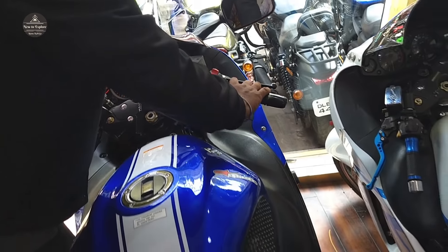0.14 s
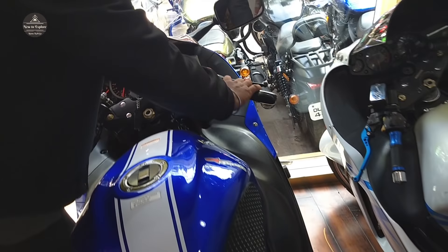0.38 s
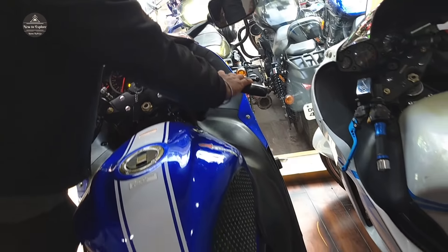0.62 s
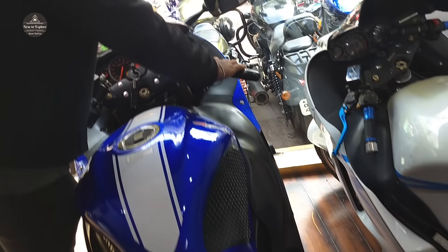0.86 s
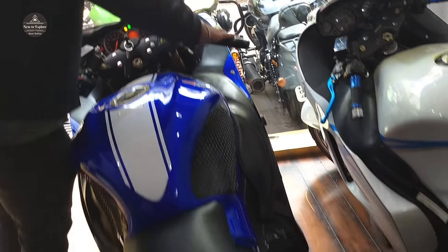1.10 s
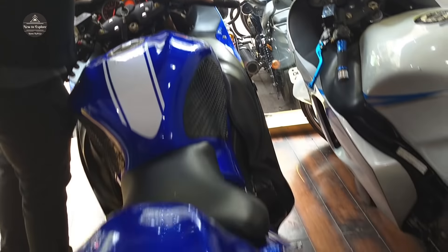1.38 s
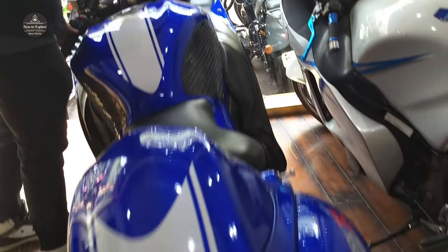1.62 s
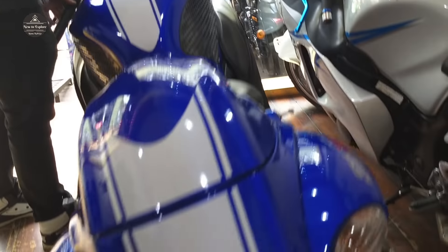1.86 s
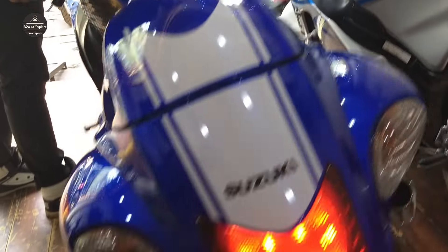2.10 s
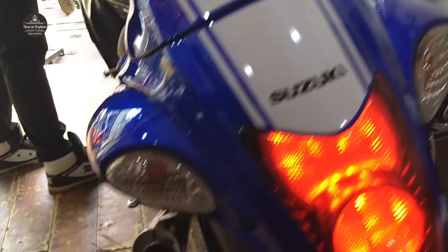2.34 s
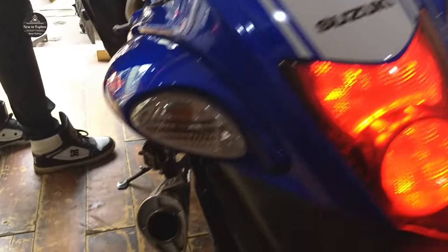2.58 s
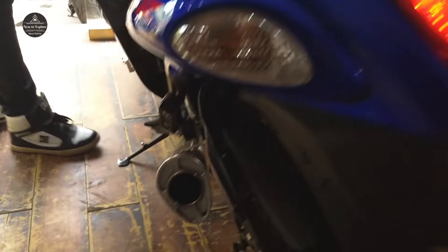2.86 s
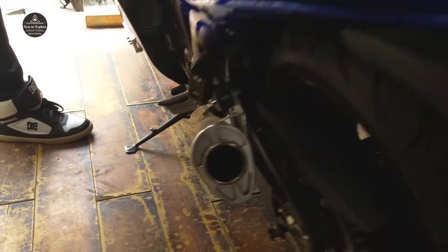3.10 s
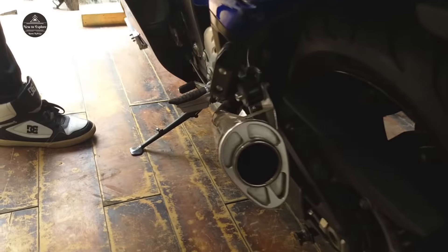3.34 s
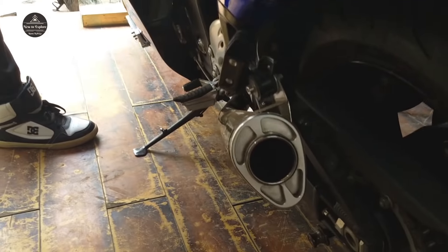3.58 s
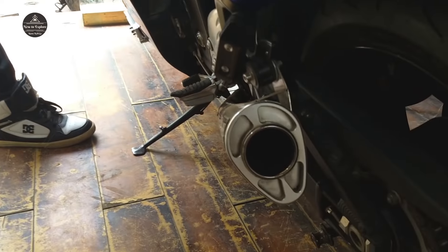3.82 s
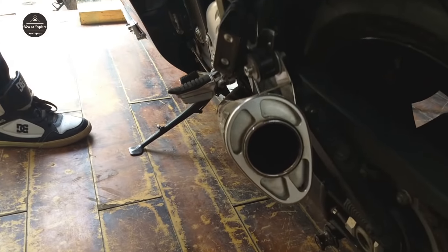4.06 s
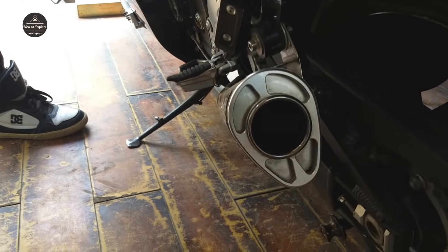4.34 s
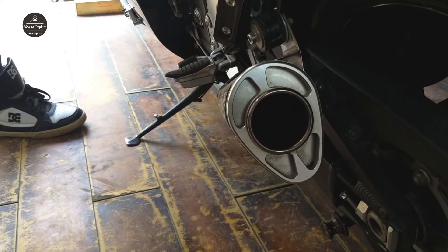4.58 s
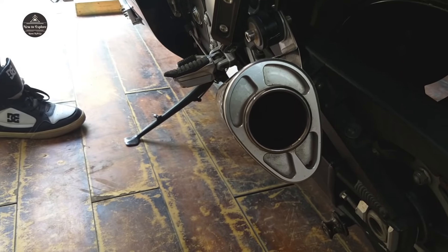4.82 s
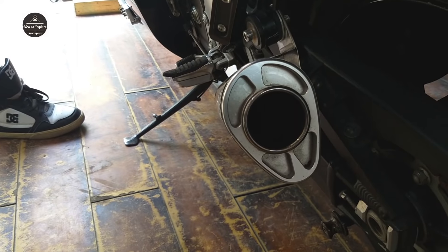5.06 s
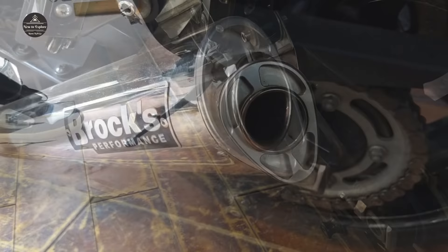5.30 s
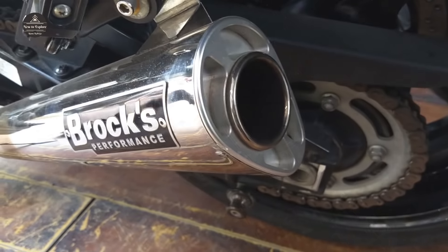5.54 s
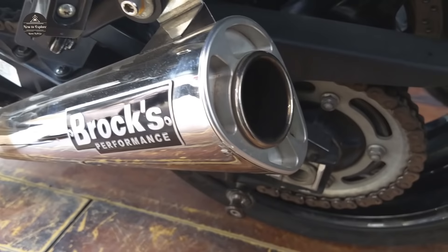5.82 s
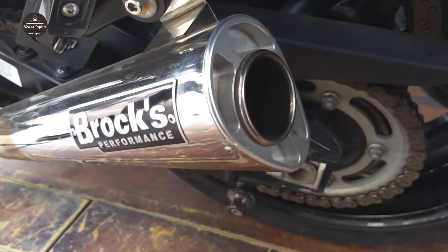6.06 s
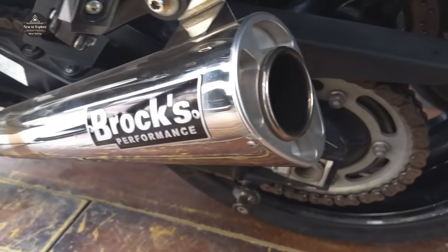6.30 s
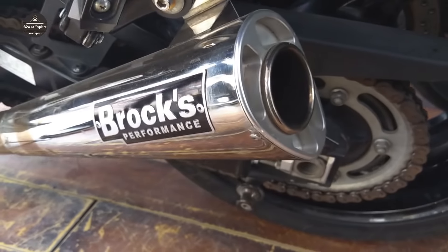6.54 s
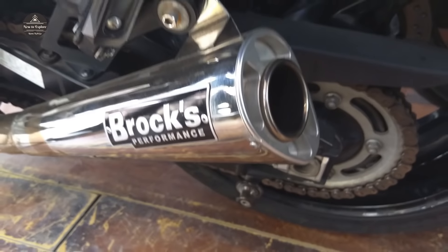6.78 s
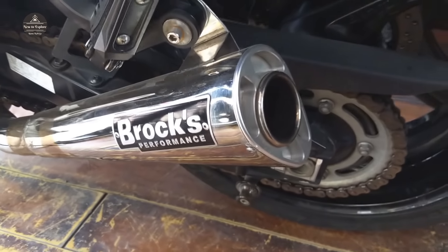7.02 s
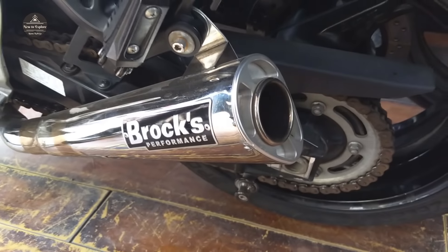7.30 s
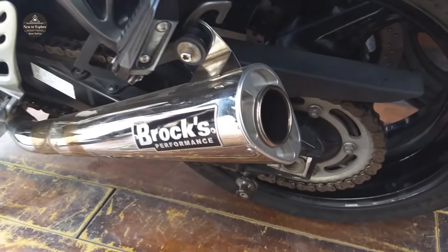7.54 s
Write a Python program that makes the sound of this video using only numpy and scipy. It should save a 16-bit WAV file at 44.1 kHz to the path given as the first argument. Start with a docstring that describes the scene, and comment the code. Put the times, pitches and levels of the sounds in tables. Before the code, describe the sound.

A four-cylinder sport motorcycle idles continuously in a shop for about 7.6 seconds, with no big revs. From 0 to 2 seconds the microphone is close above the tank: the idle is lumpy, with quick hissing gas surges several times a second, strongest around 0.5 to 0.9, each led by a low boom, over a rough rumble and faint valve ticks. Between 2 and 2.7 it passes behind the machine; surges soften and a deep, buzzing hum of regular firing comes forward, wavering slightly in pitch and strength. From 4.1 the hum stumbles briefly now and then. Around 5.35 the view steps beside the pipe end with a soft low puff and a brief break in the hum; the hiss changes colour, its treble first duller, then recovering. Another clear miss and boom comes near 6.65, then the throaty idle runs on and is cut off. Loudness stays nearly level.

```python
"""In a shop, a four-cylinder sport motorcycle idles lumpily; the microphone moves from above the tank
to behind the machine, then beside the exhaust pipe end. Regular firings hum as steady tones, uneven
ones boom as coloured noise, and the pipe rings at its own notes. Filtered noise makes the gas hiss, short
rings make the valves tick, and one soft low push is a puff of gas. A fast gain control then
evens out the loudness, so the levels in the tables are those before it."""
import sys
import numpy as np
from scipy import signal
from scipy.io import wavfile
from scipy.ndimage import uniform_filter1d

SR = 44100
rng = np.random.default_rng(int(sys.argv[2]) if len(sys.argv) > 2 else 0)


def generate_wav(sig):
    """Save sig (samples, or channels by samples) to the path in sys.argv[1] as 16-bit PCM at SR."""
    pcm = np.round(np.clip(np.atleast_2d(sig).T, -1, 1) * 32767).astype(np.int16)
    wavfile.write(sys.argv[1], SR, pcm)


def volts(x):
    """Linear amplitude factor 10**(x/20) for a level x in dB, scalar or array-like."""
    e = np.asarray(x, float) / 20
    return 10 ** e


N = 337365


def evened(x):
    """Scales a sound to an average strength (rms) of 1."""
    return x / np.sqrt(np.mean(x ** 2) + 1e-20)


def curves(rows):
    """Draws straight lines between the rows of a table, one curve for each column after the time."""
    times, *columns = np.transpose(rows)
    return [np.interp(np.arange(N) / SR, times, column) for column in columns]


def wander(hz):
    """Slow chance: noise with what lies above hz filtered away, rms 1."""
    lowpass = signal.butter(2, hz, fs=SR, output="sos")
    return evened(signal.sosfilt(lowpass, rng.standard_normal(N)))


def coloured(x, points, size=16384):
    """Filters a sound to the given spectrum, with no sound ahead of its cause (minimum phase)."""
    f, db = np.transpose(points)
    hz = np.abs(np.fft.fftfreq(size, 1 / SR))
    level_db = np.interp(np.log(hz + 1), np.log(f + 1), db)
    log_gain = np.log(volts(np.maximum(level_db, -100)))
    taps = np.fft.ifft(np.exp(np.conj(signal.hilbert(log_gain)))).real[:size // 2]
    return signal.oaconvolve(x, taps)[:N]


def bumps(times, heights, lengths):
    """Smooth swells, each centred on its time and as wide as its length at half height."""
    t = np.arange(0, N + 64, 64) / SR  # a coarse clock is enough for slow swells
    swells = sum(height * np.exp(-4 * np.log(2) * ((t - s) / length) ** 2)
                 for s, height, length in zip(times, heights, lengths))
    return np.interp(np.arange(N) / SR, t, swells)


# How much of the front of the engine is heard as the microphone leaves the tank: t/s, share (0-1)
FRONT_SHARE = [(0, 0.94), (1.2, 0.88), (1.9, .75), (2.15, 0.5), (2.45, 0.07), (2.7, 0.12), (7.65, 0.06)]


def placed(above, behind, beside):
    """Blends three values as the microphone goes from above the tank to behind, then beside the pipe end."""
    beside_s, step_s = 5.35, 0.088  # middle and length of the step to the side
    front = np.clip(curves(FRONT_SHARE)[0], 0, 1)
    step = np.clip((np.arange(N) / SR - beside_s) / step_s + .5, 0, 1)
    return front * above + (1 - front) * ((1 - step) * behind + step * beside)


# Gas hiss between the surges: t/s, level/dB
HISS_BASE = [(0, -48), (.5, -50), (1.3, -46.5), (2.3, -46.5), (2.9, -44.5), (3.4, -45), (4.1, -45.5),
             (4.5, -47), (5.2, -48), (6.4, -47.5), (6.9, -47.5), (7.4, -48), (7.65, -46.5)]
# The idle stumbles and gas surges out: t/s of the surge's peak, surge level/dB, surge length/s,
# level/dB of the pipe's boom just before it (below 0: a dip)
IDLE_STUMBLES = [(0.042, 2.5, 0.095, -13), (0.268, 5, .08, 9.5), (0.353, 5, .07, 3), (0.482, 9, .08, 13.5),
                 (0.652, 9.5, .09, 11), (.8, 8, 0.092, 7), (.94, 6.5, 0.073, 8.5), (1.097, 6.5, .07, 4),
                 (1.229, 5, 0.068, 8.5), (1.406, 4, .11, 5), (1.52, 5.5, .09, 9.5), (1.658, 2, .08, 3),
                 (1.83, 2, .07, 11.5), (2.001, 3.5, .06, 1), (2.141, 3, .11, 6), (2.28, 3.5, .13, 10),
                 (2.46, 3, .05, 1), (2.535, 4, .06, 8), (2.838, 2.5, .2, 9), (3.011, 2, 0.064, 4),
                 (3.167, 2.5, .12, 4), (3.472, 2.5, .09, -2), (3.609, 3, .08, 9), (3.9, 2.5, .08, -2),
                 (4.107, 3.5, .13, 5), (4.309, 4, .09, 0), (4.678, 4, .16, 5), (4.834, 3.5, .07, -9),
                 (5.039, 5, .15, 4), (5.371, 5.5, .2, 2), (5.673, 3.5, .1, -2), (5.93, 3.5, .14, 0.5),
                 (6.215, 3.5, .12, 0), (6.666, 4, .12, 10), (6.816, 4, .09, 5), (7.014, 4.5, .2, 8),
                 (7.257, 4.5, .1, 1), (7.571, 3, .09, 6)]


def flow():
    """Level of the gas flow in dB: a slow base plus a surge for each stumble."""
    times, surge_db, length, _ = np.transpose(IDLE_STUMBLES)
    return curves(HISS_BASE)[0] + bumps(times, surge_db, length)


def surge(late_s):
    """How far the gas flow stands above its slow mean, in dB, felt late_s later (below 0: earlier)."""
    flow_db = flow()
    above_mean = flow_db - uniform_filter1d(flow_db, SR // 3)
    return np.roll(above_mean, round(late_s * SR))


# Engine speed before its small unsteadiness: t/s, firing rate f/Hz
ENGINE_SPEED = [(0, 43.9), (.75, 44.4), (1.0, 44.3), (1.25, 45), (1.85, 44.1), (2.9, 45.9), (3.25, 45),
                (3.75, 45.1), (4.1, 45.7), (4.5, 44.95), (4.75, 45.5), (5.1, 45.15), (5.75, 45.05),
                (6.05, 45.5), (6.5, 44.9), (7.0, 45.7), (7.4, 45.1), (7.65, 45.06)]


def firings(unsteady=.009, stumble=.0012):
    """Counts firings so far; the crank runs up into each surge and sags after it."""
    lope = stumble * (surge(-.03) - surge(.05))  # stumble: share of the speed per dB
    rate = curves(ENGINE_SPEED)[0] * (1 + lope + unsteady * wander(8))
    return np.cumsum(rate) / SR


# A puff of exhaust gas hits the microphone: t/s of its start, level/dB, f/Hz, length/s
GAS_PUFFS = [(5.33, -20, 29.5, 0.035)]


def puffs():
    """A puff of gas is a low, soft push: a slow swing that swells and fades."""
    t = np.arange(N) / SR
    total = 0
    for s, db, hz, length in GAS_PUFFS:
        swell = np.exp(-.5 * ((t - s - length / 2) / (length / 3)) ** 2)
        total = total + volts(db) * swell * np.sin(2 * np.pi * hz * (t - s))
    return total


# Notes of the ringing valve gear: f/Hz, level/dB, t60/s (time to fall by 60 dB)
VALVE_RINGS = [(5880, -70.5, 0.0071), (12070, -74.5, .0065)]


def valves(turns):
    """Three ticks a firing, of uneven strength, ring the valve cover."""
    ticks = (np.diff(np.floor(3 * turns), prepend=0) > 0) * (1 + .5 * rng.standard_normal(N))
    t = np.arange(2000) / SR
    total = 0
    for hz, db, t60 in VALVE_RINGS:
        ring = volts(-60 * t / t60) * np.sin(2 * np.pi * hz * t)
        total = total + volts(db) * evened(signal.oaconvolve(ticks, ring)[:N])
    return total


# Colour of the hiss above the tank: f/Hz, level/dB
HISS_COLOUR_ABOVE = [(410, -34), (700, -10), (760, -10.5), (860, -2), (1000, -5.5), (1350, -3.5),
                     (1550, -7), (1900, -12), (3210, -19), (5010, -22.5), (7000, -27.5), (12100, -40),
                     (13500, -46)]
# Colour of the hiss behind the machine: f/Hz, level/dB
HISS_COLOUR_BEHIND = [(410, -28.5), (700, -8), (754, -9.5), (853, -3), (942, -6.5), (1200, -3.5),
                      (1470, -8.5), (2200, -11), (3210, -17), (5010, -22), (7000, -29), (10500, -35),
                      (12100, -43), (13500, -49)]
# Colour of the hiss beside the pipe end: f/Hz, level/dB
HISS_COLOUR_BESIDE = [(410, -30.5), (700, -11.5), (1030, -5), (1200, -3.5), (2250, -8), (2680, -14),
                      (3660, -16.5), (6600, -25), (10500, -30), (12200, -37), (14000, -38)]
# Change in the treble of the hiss: t/s, level/dB
HISS_TREBLE = [(0, 0), (5.3, 0), (5.5, -5.5), (6.1, -2.5), (6.6, 1.45), (7.1, 0), (7.65, 1.5)]


def hiss(turns, steady=1.5, puff=0.9, flicker_db=1.27):
    """Gas rushes out as noise, puffing twice a firing, coloured by where the microphone is."""
    puffing = steady + np.exp(-(2 * turns % 1) / puff)  # puff: fading time as a share of the gap
    gas = puffing * volts(flicker_db * wander(58)) * rng.standard_normal(N)
    places = HISS_COLOUR_ABOVE, HISS_COLOUR_BEHIND, HISS_COLOUR_BESIDE
    colour = placed(*(evened(coloured(gas, points)) for points in places))
    lowpass = signal.butter(4, 6500, fs=SR, output="sos")  # treble starts at 6500 Hz
    low = signal.sosfiltfilt(lowpass, colour)
    treble = colour - low
    return volts(flow()) * (low + volts(curves(HISS_TREBLE)[0]) * treble)


# Nearness to the pipe end: t/s, share (0-1)
PIPE_NEARNESS = [(0, 0.3), (1.8, 0.3), (2.5, 0.78), (7.65, 0.93)]
# Colour of the uneven firings above the tank: f/Hz, level/dB
BOOM_COLOUR_ABOVE = [(18, -34), (32, -11.5), (110, -7.5), (190, -4.5), (240, -8.5), (285, -5), (340, -9),
                     (410, -17), (520, -16.5), (620, -27), (760, -33.5), (900, -28.5), (1200, -65.5)]
# Colour of the uneven firings at the pipe end: f/Hz, level/dB
BOOM_COLOUR_PIPE = [(18, -39.5), (32, -13), (70, -16), (110, -3.5), (200, -4.5), (250, -10.5), (310, -9.5),
                    (350, -13), (400, -15.5), (520, -20), (600, -29.5), (900, -38.5), (1200, -66)]
# Unevenness of the firings, before the surges add to it: t/s, level/dB
UNEVENNESS = [(0, -23), (.5, -25), (2, -25.5), (3, -25.5), (4, -24.5), (5, -26.5), (5.5, -26.5),
              (6.5, -25.5), (6.7, -24), (7.1, -24.5), (7.65, -26)]


def lumps(turns, roar=1.12, t60=0.16):
    """Firings are stronger or weaker than the mean; the surplus booms in the pipe and smears in the shop."""
    beats = np.diff(np.floor(2 * turns), prepend=0) > 0  # two kicks a firing
    surplus = evened(beats * rng.standard_normal(N))
    echoes = rng.standard_normal(4000) * volts(-60 * np.arange(4000) / SR / t60)
    smeared = evened(signal.oaconvolve(surplus, echoes)[:N])
    drive = smeared + roar * rng.standard_normal(N)
    near = np.clip(curves(PIPE_NEARNESS)[0], 0, 1)
    above = evened(coloured(drive, BOOM_COLOUR_ABOVE))
    at_pipe = evened(coloured(drive, BOOM_COLOUR_PIPE))
    level_db = curves(UNEVENNESS)[0] + 0.66 * surge(0.0065)
    return volts(level_db) * (np.sqrt(1 - near) * above + np.sqrt(near) * at_pipe)


# Loudness of each pipe note: level/dB above the tank, level/dB behind the machine,
# level/dB beside the pipe end, share of the boom, share of the unevenness, wander level/dB
PIPE_LOUDNESS = [(-25, -47, -43, 1.05, 0.88, .8), (-25, -30, -35.5, 0.59, 1.2, 1.5),
                 (-24, -26.5, -28, 0.17, 0.27, 1.74), (-28, -27.5, -28.5, .2, 1.1, 2.2)]
# Slow change of the three upper pipe notes: t/s, then level/dB of each
PIPE_DRONE = [(0, -2, -2.5, 3.5), (.2, .1, 3.5, -6), (.55, -2.8, 2, 2), (.9, -0.5, 2, 1.5),
              (1.1, 2.5, -2.5, -.1), (1.45, -1, -1, 4), (1.85, 4, -9, -4), (2.2, -3.5, 0.5, 2),
              (3, 1, -3, 3), (3.65, -1, 2, 1), (3.9, 2, 0.17, -2), (4.4, -1, 3.5, 2.5), (5, 3.5, -.1, -1),
              (5.2, -7, 1.5, -0.14), (6.4, -5.5, -2.5, -4.5), (6.7, 5.5, -0.5, 3), (7.2, 1, 2, -2),
              (7.65, 0.8, -9, -1)]


def ringing():
    """Level of each pipe note in dB: it follows the place, the booms and the unevenness of the firings."""
    times, _, _, boom_db = np.transpose(IDLE_STUMBLES)
    lead_s, length_s = 0.044, 0.075  # each boom comes before its surge
    booms = bumps(times - lead_s, boom_db, np.full(len(times), length_s))
    uneven = curves(UNEVENNESS)[0]
    slow = [0] + curves(PIPE_DRONE)  # the lowest note has no slow change of its own
    levels = []
    for (above, behind, beside, boom, share, drift_db), slow_db in zip(PIPE_LOUDNESS, slow):
        driven = boom * booms + share * (uneven - uneven.mean())
        levels.append(placed(above, behind, beside) + slow_db + driven + drift_db * wander(7))
    return levels


# Pipe notes rung by uneven firing: f/Hz before bending, wavering share of the pitch,
# pitch bend share per dB of surge
PIPE_NOTES = [(57, .015, .002), (109, .022, .001), (165, .014, -.007), (194, .016, .004)]


def pipe():
    """The air in the pipe sounds at its own wavering notes, bent by the surges of gas."""
    push_db = surge(0.051)
    total = 0
    for (hz, waver, bend), db in zip(PIPE_NOTES, ringing()):
        pitch = hz * (1 + bend * push_db + waver * wander(7.6))
        total = total + np.sqrt(2) * volts(db) * np.cos(2 * np.pi * np.cumsum(pitch) / SR)
    return total


# The regular firing: multiple of the firing rate, level/dB above the tank, level/dB behind the machine,
# level/dB beside the pipe end, dB per dB of surge, dB per dB of a miss, slow wander level/dB
FIRING_MULTIPLES = [(2, -35, -24, -23, 1.5, 0.27, 0.1), (3, -23.5, -20.5, -19, 0.17, 0.81, 0.53),
                    (4, -29.5, -26, -26, 1.1, -0.2, 1), (5, -32.5, -25, -23, 0.6, 0.06, 0.3)]
# The third multiple, the strongest hum, about its mean: t/s, level/dB
MAIN_HUM = [(0, -17), (.1, 7), (.3, -1.5), (.55, -3), (.85, -0.5), (1.1, 1.5), (1.5, 3), (2.4, 1.5),
            (2.65, -1.5), (3.1, -6.5), (3.25, 0.8), (3.75, 2), (3.95, 0.3), (4.3, -3), (4.55, 4.5),
            (4.85, -2), (5.2, 3.5), (5.6, 0.8), (6.15, -0.5), (6.5, 4), (6.95, -1.5), (7.15, -6.5),
            (7.4, 2.5), (7.65, -1.3)]
# The regular firing misses a beat and the hum dips: t/s of the middle, depth level/dB, length/s
MISSED_BEATS = [(1.787, -8, 0.031), (2.533, -8, 0.03), (4.142, -8.5, 0.072), (4.36, -10.5, 0.084),
                (4.75, -9.5, .08), (4.997, -10, 0.12), (5.406, -12, 0.15), (5.689, -7, 0.066),
                (5.926, -3, .1), (6.22, -6.5, 0.06), (6.64, -15, 0.079), (6.85, -4, .06),
                (7.058, -2.5, .08)]
# Slow change of the second, fourth and fifth multiple about their means: t/s, then level/dB of each
SLOW_SWAY = [(0, 2, .1, -2), (.7, -1, 2, -0.5), (1.3, 3, .1, 0.7), (2, -1, 4, 1.5), (2.55, 2.5, 1, 1),
             (3.05, -0.8, 3, -3.5), (3.5, -1.5, 0, 0.4), (3.95, 1, -0.5, 2.5), (4.4, -0.3, -.1, 0),
             (5, -0.5, -0.5, 1.4), (5.4, 4.5, 0, -2), (5.75, 1.5, -4.5, -1.5), (6.2, 1.5, 2.5, 2.5),
             (6.6, 1, 0.5, -.1), (7, .1, 5, 1), (7.65, -1, 3.5, 1.1)]


def order_levels():
    """Pairs each multiple with its level in dB: place, surges, misses and slow swells added up."""
    miss_db, surge_db = bumps(*np.transpose(MISSED_BEATS)), surge(0)
    second, fourth, fifth = curves(SLOW_SWAY)
    slow = [second, curves(MAIN_HUM)[0], fourth, fifth]
    levels = []
    for (k, above, behind, beside, push, miss, drift_db), slow_db in zip(FIRING_MULTIPLES, slow):
        driven = push * surge_db + miss * miss_db
        levels.append((k, placed(above, behind, beside) + slow_db + driven + drift_db * wander(5.5)))
    return levels


# Weak tones with no slow change: multiple of the firing rate, level/dB
WEAK_TONES = [(1, -36.5), (6, -41.5), (7, -38)]


def tones(turns, flutter_db=0.42):
    """Regular firing hums: two swings a firing, the second mirrored, so odd multiples lag less."""
    even_lag, odd_lag = 2.0, .6  # radians
    total = 0
    for k, db in order_levels() + WEAK_TONES:
        lag = odd_lag if round(k) % 2 else even_lag
        level = np.sqrt(2) * volts(db + flutter_db * wander(15))
        total = total + level * np.cos(2 * np.pi * round(k) * turns - lag)
    return total


def scene():
    """The parts of the engine run together; a surge of unburnt gas weakens the firing and pipe notes."""
    turns = firings()
    firing = (tones(turns) + pipe()) * volts(-.3 * surge(0))
    return (firing + lumps(turns) + hiss(turns) + valves(turns) + puffs())[None]


def top_cut(x):
    """Nothing passes above the cut-off."""
    return signal.sosfilt(signal.butter(12, 14170, fs=SR, output="sos"), x)


def record(dry, hold_db=-13.5, low_hz=28, top_hz=13450):
    """Fast gain control pulls the power towards one level; then a soft ceiling and band limits."""
    power = uniform_filter1d(uniform_filter1d(dry[0] ** 2, 500), 500)
    level_db = 10 * np.log10(np.abs(power) + 1e-9)
    held = np.tanh(dry * volts(.6 * (hold_db - level_db)))  # makes up 60 % of the difference
    highpass = signal.butter(2, low_hz, "high", fs=SR, output="sos")
    cut = signal.sosfiltfilt(highpass, held, padlen=SR // 4)
    cut = signal.oaconvolve(cut, signal.firwin(255, top_hz, fs=SR)[None], "same")
    return top_cut(cut)


dry = scene()
out = record(dry)
generate_wav(out)
```